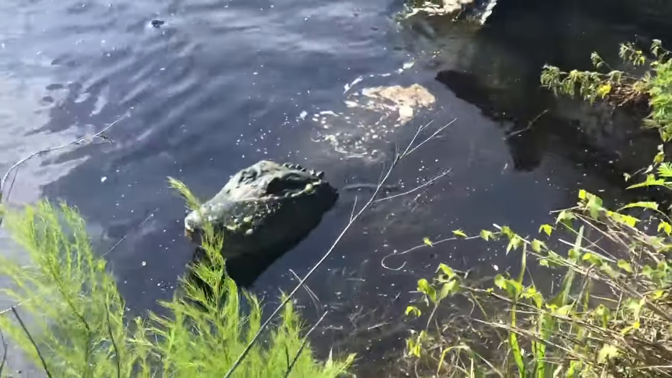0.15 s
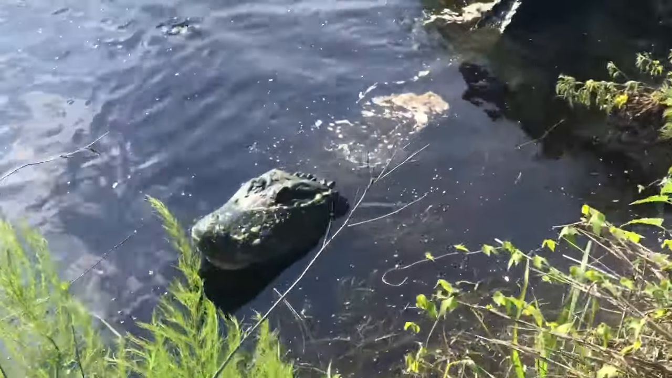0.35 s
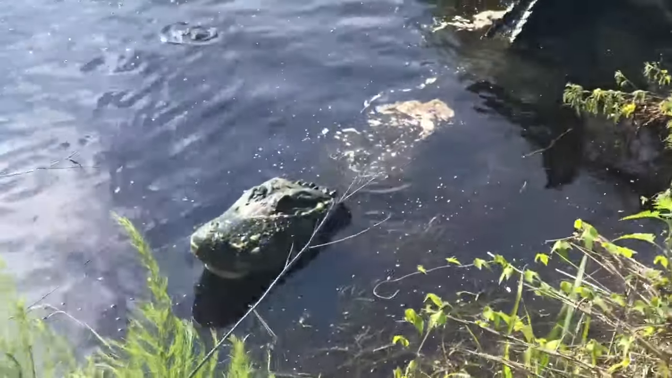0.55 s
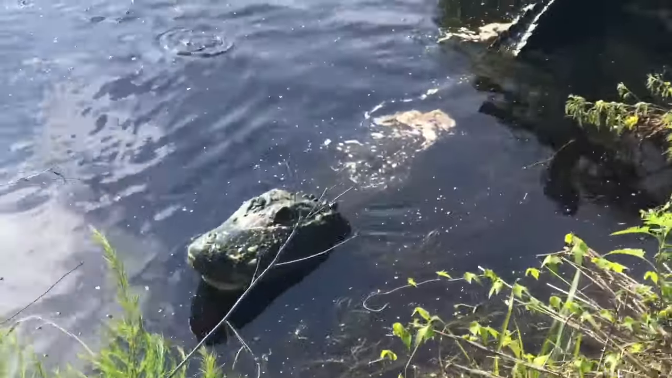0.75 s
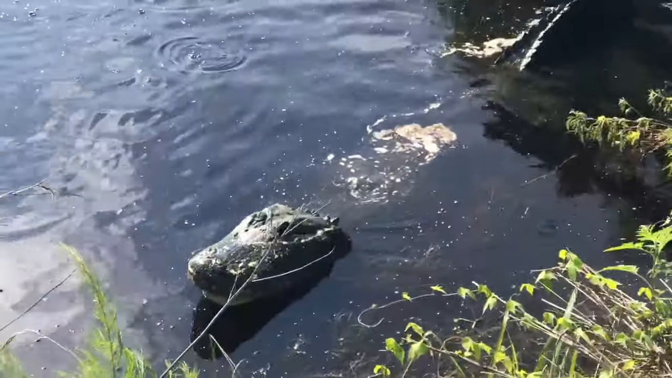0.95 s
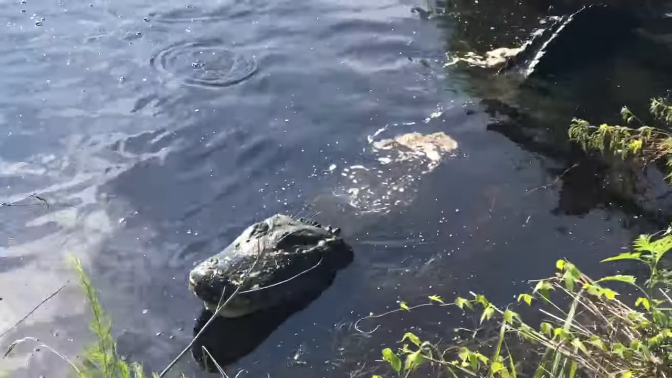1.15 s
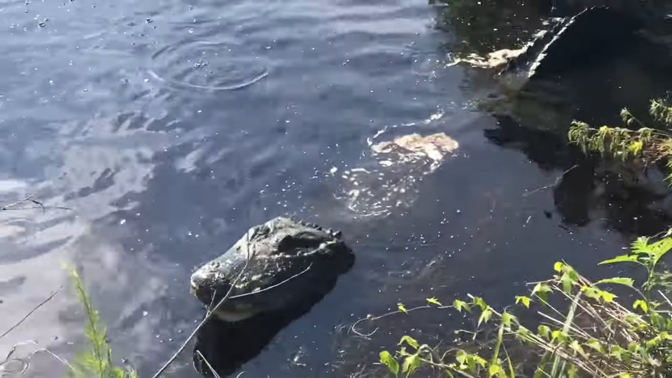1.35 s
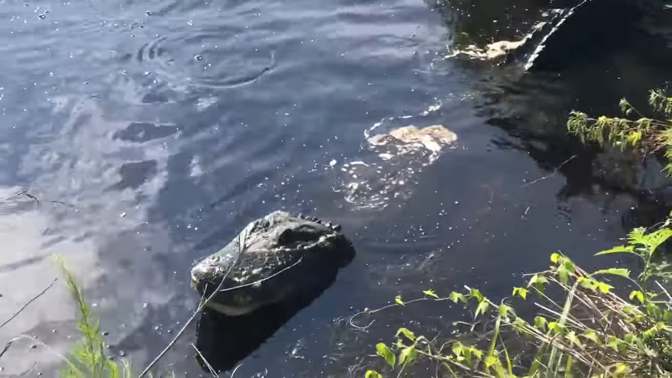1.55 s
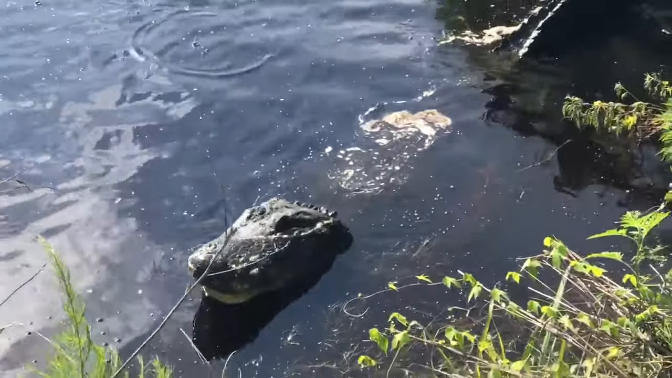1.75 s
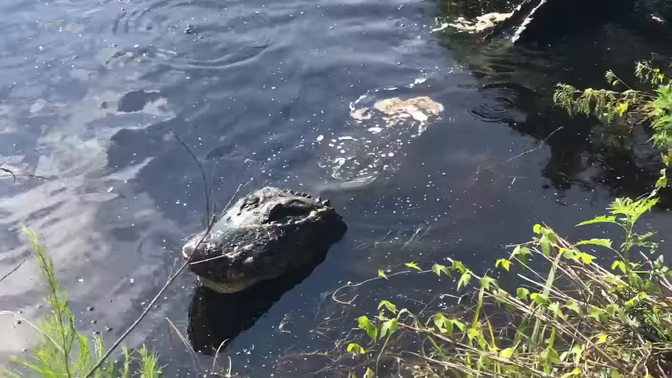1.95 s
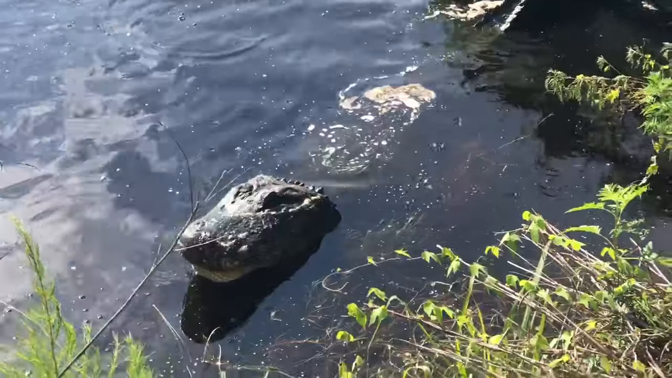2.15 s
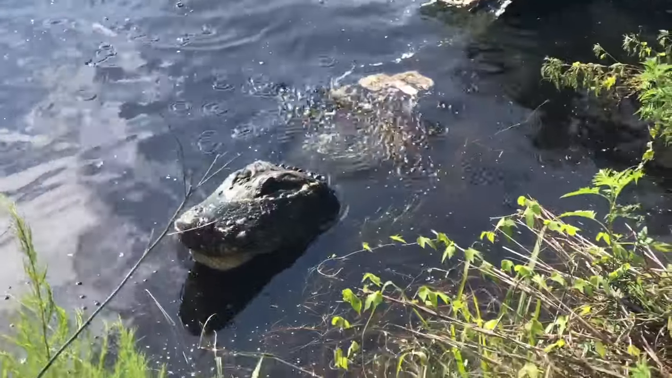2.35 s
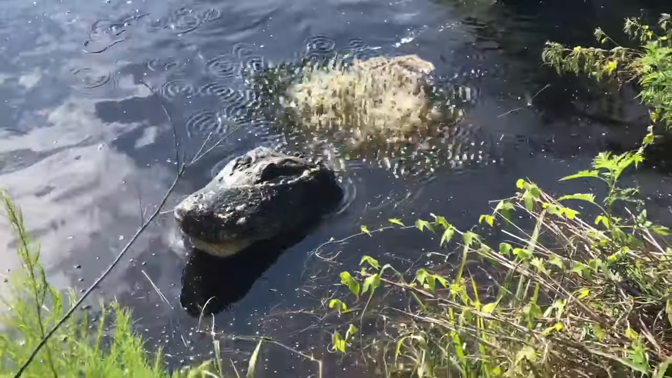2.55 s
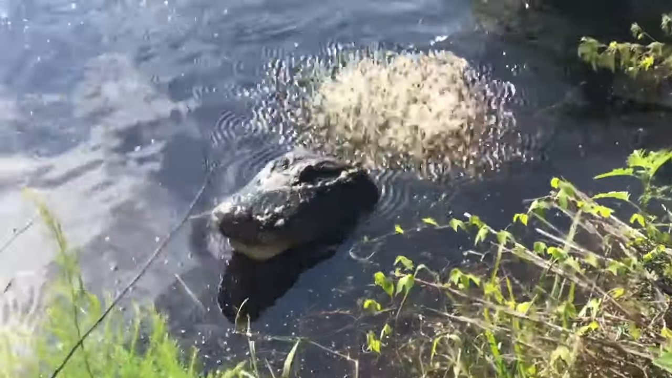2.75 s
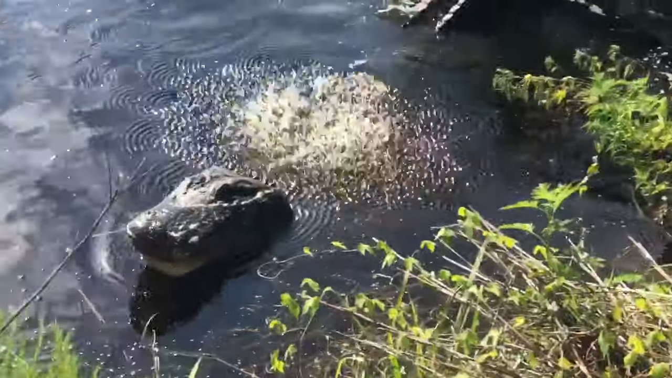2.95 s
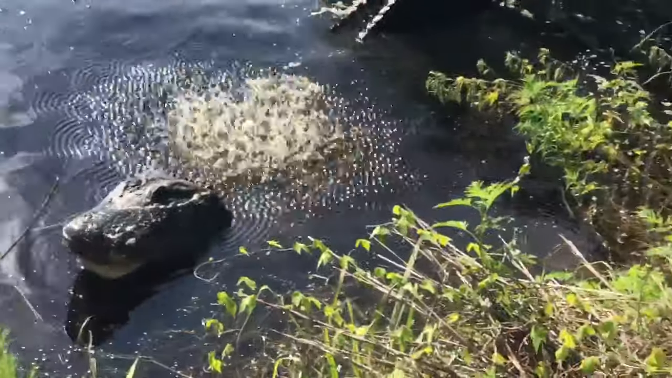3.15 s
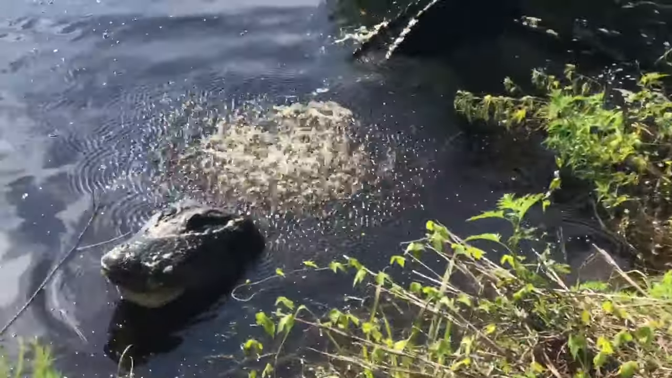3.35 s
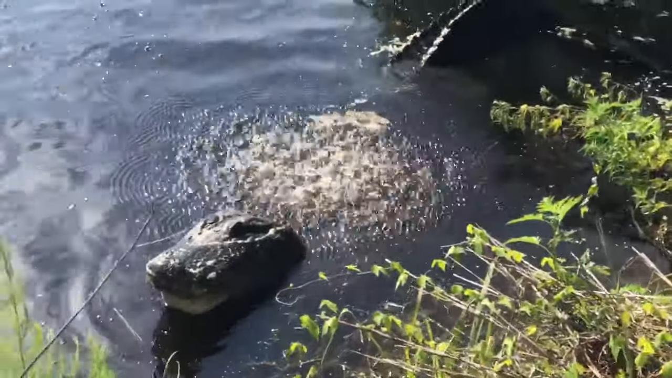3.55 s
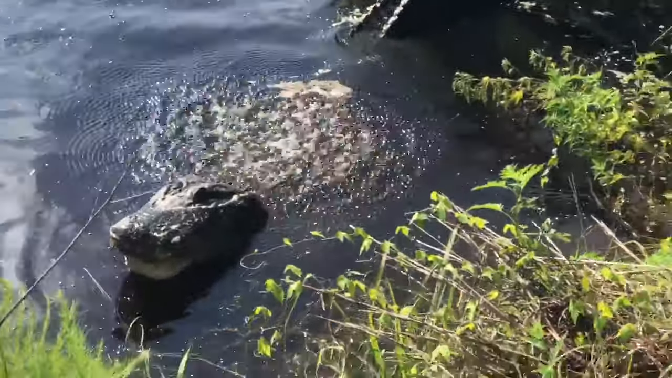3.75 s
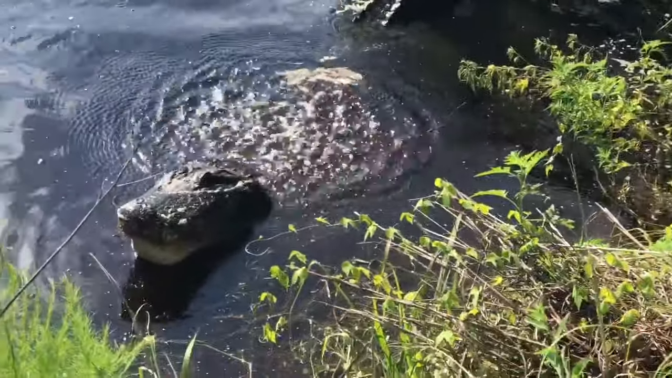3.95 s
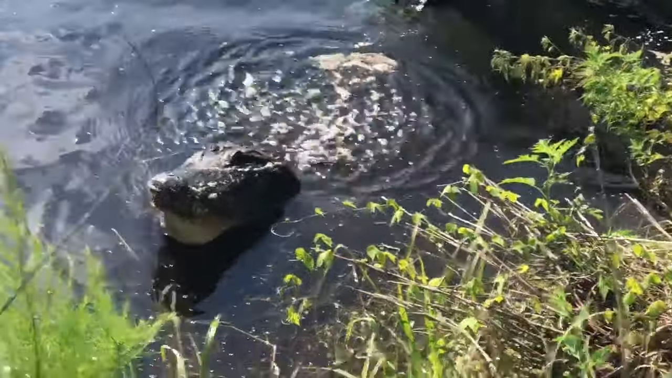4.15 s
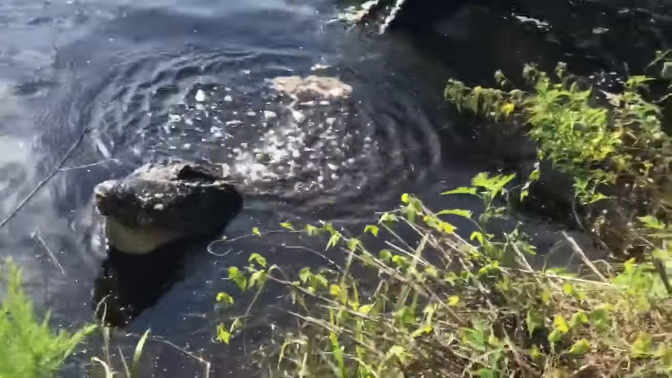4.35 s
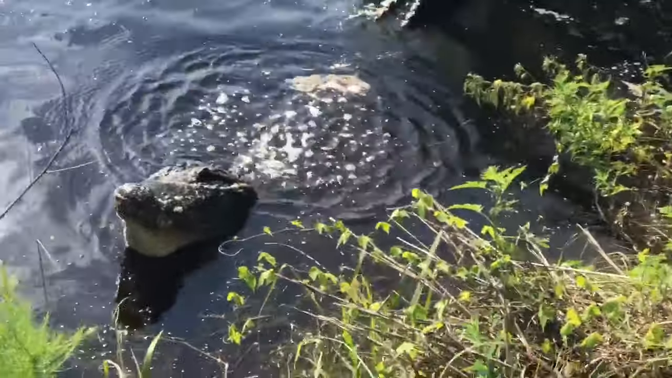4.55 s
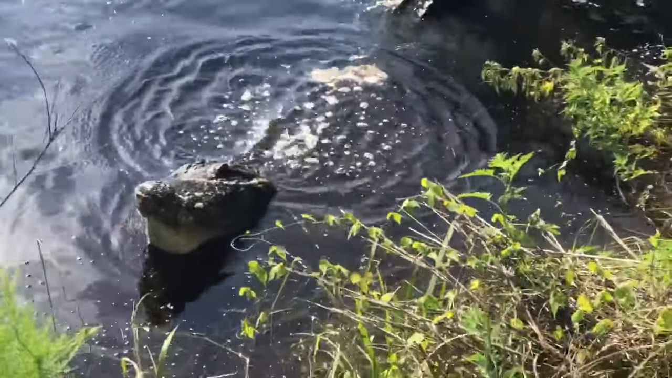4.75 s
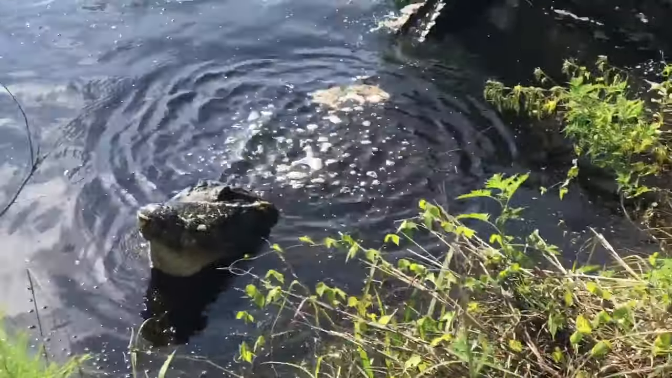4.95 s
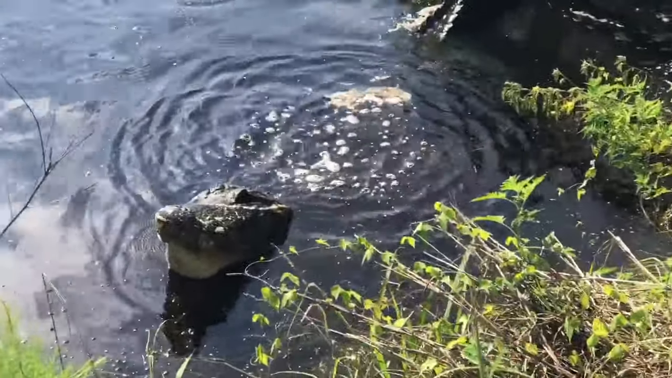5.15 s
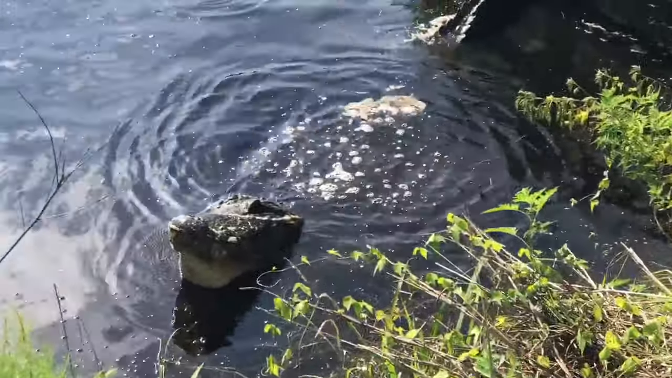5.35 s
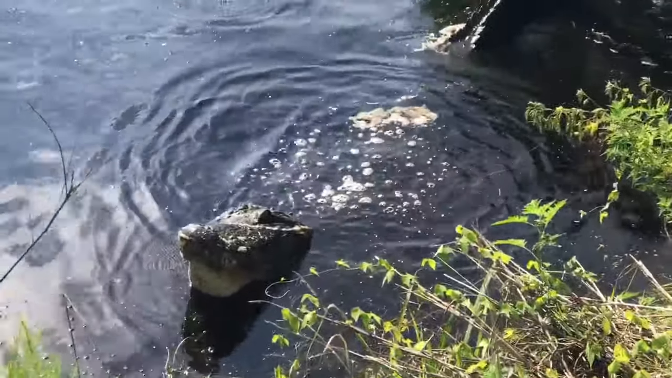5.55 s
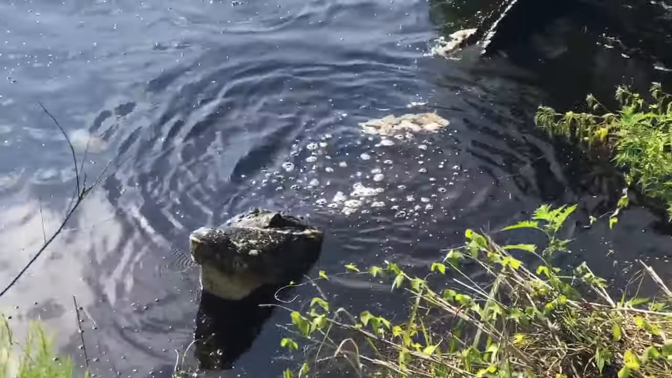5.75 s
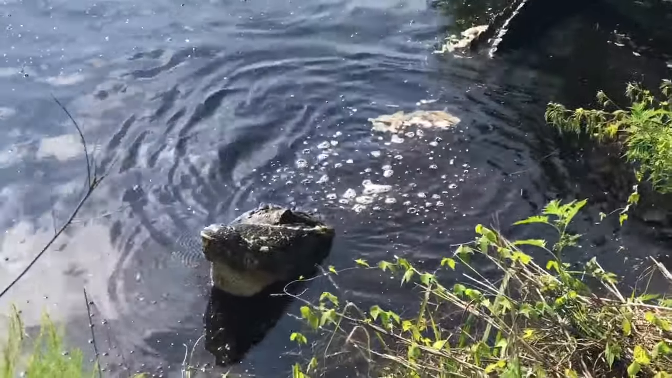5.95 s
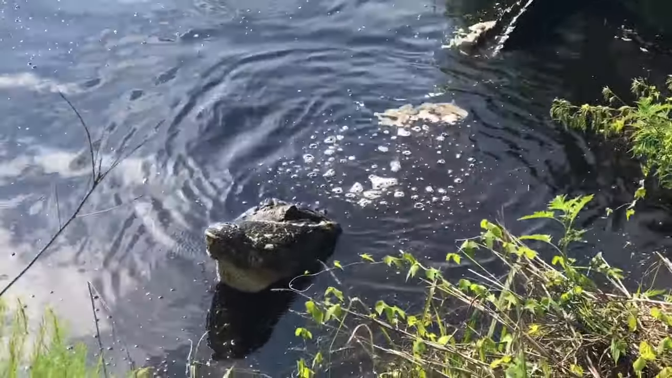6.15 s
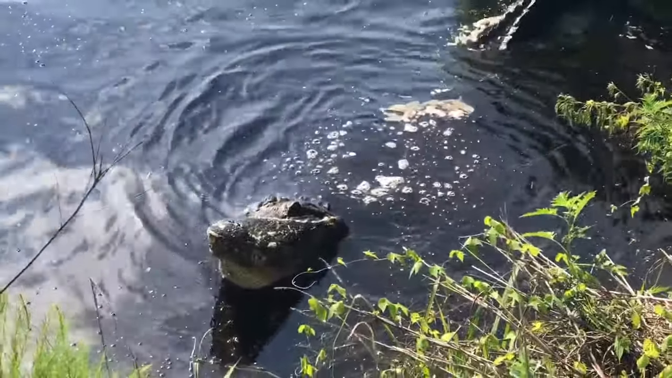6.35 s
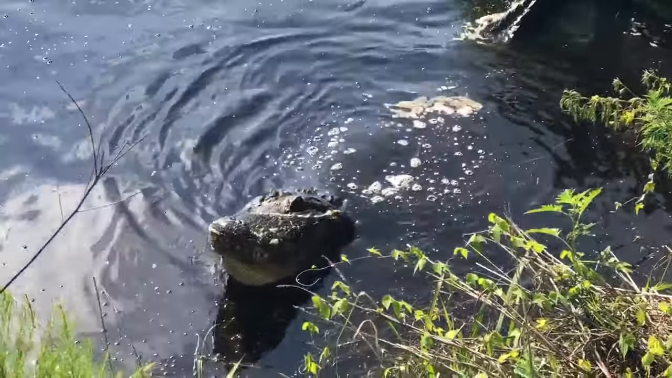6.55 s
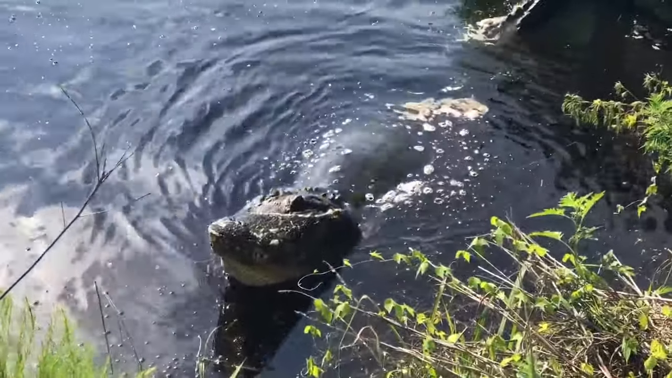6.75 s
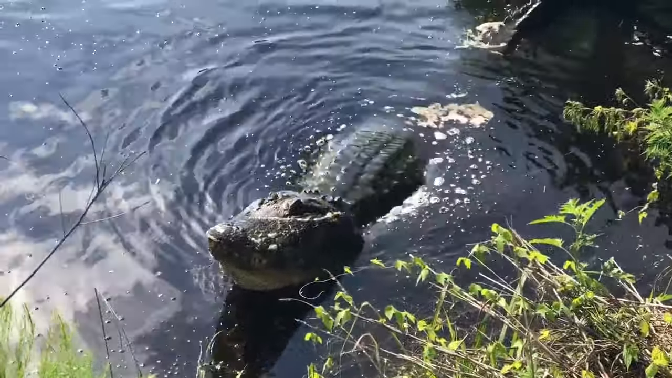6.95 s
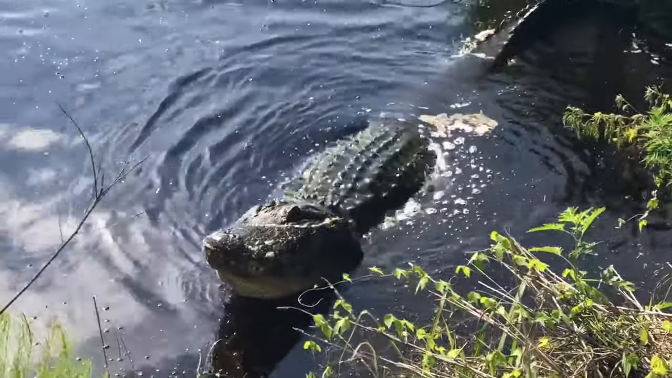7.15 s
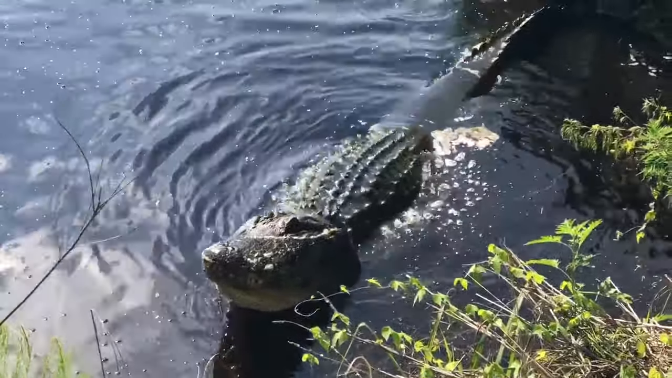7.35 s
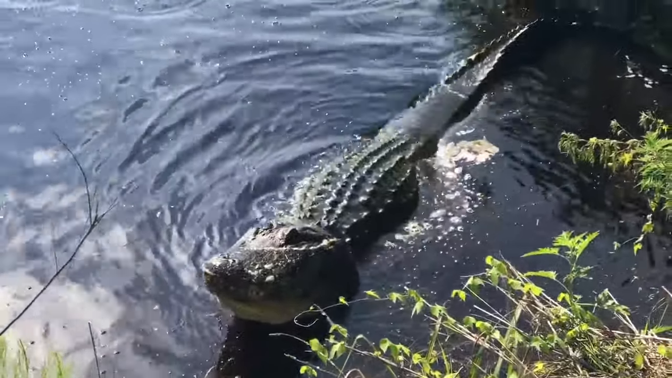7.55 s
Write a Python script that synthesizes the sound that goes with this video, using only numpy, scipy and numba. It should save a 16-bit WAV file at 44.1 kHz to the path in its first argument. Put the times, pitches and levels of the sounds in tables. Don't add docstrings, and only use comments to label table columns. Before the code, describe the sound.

Outdoors at a still pond, a close handheld microphone picks up soft lapping, small drips, grass ticks, faint insects and wind bumps. Then the alligator's flanks thump fast and low, throwing water in a pulsing, sizzling spray. A few loose throat flaps catch into a loud, deep, rattling bellow with breathy hiss, slowing into separate pulses and dying away. Lapping and brighter drips return.

```python
import sys
import numpy as np
from scipy import signal
from scipy.fft import rfft, irfft
from scipy.io import wavfile
from scipy.ndimage import uniform_filter1d
from numba import njit

SR = 44100
rng = np.random.default_rng(int(sys.argv[2]) if len(sys.argv) > 2 else 0)


def unload_wav(signal):
    wavfile.write(
        sys.argv[1],
        SR,
        np.round(np.clip(np.atleast_2d(signal).T, -1, 1) * 32767).astype(np.int16),
    )


def ratio(d):
    e = np.asarray(d, float) / 20
    return 10 ** e


N = 335160

# (time [s], effort [dB])
BELLOW = [
    (4.016, -16),
    (4.3, -15.5),
    (4.9, -18.5),
    (5.2, -19.5),
    (5.42, -25),
    (5.8, -28),
    (5.98, -32),
    (6.1, -35),
    (6.2, -46),
]
# (time [s], rate [Hz])
FOLD_RATE = [(4.016, 53.79), (4.25, 51.96), (4.65, 47.81), (5.04, 42.67), (5.3, 36.0), (5.45, 30.21),
             (5.75, 26.47), (5.92, 25.35), (6.2, 15.69)]
# (rate [Hz]), (share [1])
WEAK = ((53, 52, 50.5, 49.5, 47.5, 46.3, 39.5, 36.5, 26, 16),
         (.04, .15, .15, .04, .06, .32, .25, .03, .06, .5))
# (rate [Hz]), (lead [cycles])
EARLY = ((53, 52, 50.5, 49.5, 47.5, 46.3, 39.5, 36.5), (.02, .05, .058, .012, .012, .055, .06, 0))
# (rate [Hz]), (share [1])
REBOUND = ((52, 50.5, 49, 43, 31, 28), (.45, .36, 0, .05, .28, .35))
# (rate [Hz]), (delay [ms])
REBOUND_MS = ((53.5, 40), (9.4, 12))
# (rate [Hz]), (centre [Hz])
NECK = ((52, 50.5, 48.5, 44, 41, 38, 33, 30, 26), (200, 190, 170, 166, 158, 146, 135, 160, 175))
# (rate [Hz]), (level [dB])
PHARYNX = ((52, 46, 40, 33, 30, 24), (-2, -4.5, -4, -2, 0, -3))
# (rate [Hz]), (share [1])
PULSED = ((53.7, 53.2, 45, 29, 26, 20), (.58, .2, .35, .46, .55, .65))
# (rate [Hz]), (level [dB])
HISS_DIES = ((20, 16), (0, -16))
# (rate [Hz]), (level [dB])
UPPER = (52, 47, 42, 36, 29, 16), (-14, -12, -16, -6, -2, -5)
CHEST = (53.5, 52.8, 43, 36, 29, 16), (-10, -13, -14, -19, -18, -20)
FLIP_HZ, FORESLAP, FORESLAP_MS = 27.75, ((27.7, 25, 16), (.45, .17, .1)), -11
THROB_HZ, THROB_SPAN_HZ, THROB, THROB_REST = 49, 2.2, .3, .06
# (centre [Hz], width [Hz], level [dB])
THROAT = [(48.8, 7.5, 0), (97, 39.4, 4.5), (273, 270, 0)]

# (time [s], airflow [dB], mouth resonance [Hz], mouth opening [dB])
BREATH = [
    (3.9, -63, 960, -15),
    (4.0, -52, 950, -19),
    (4.06, -39.5, 910, -1.5),
    (4.3, -38.5, 924, -9),
    (4.6, -43, 986, -9),
    (4.95, -43, 1033, -7),
    (5.5, -48, 1140, 2),
    (5.9, -57, 1202, -1.5),
    (6.22, -66.5, 1330, 3),
]
# (centre [Hz], width [Hz], level [dB])
AIRWAY = [(635, 40, -8), (1325, 45, 1), (1385, 45, 3), (1990, 45, -6), (2212, 54, -4), (2396, 32, 1),
          (2560, 43, -8), (2837, 35, -4), (3056, 35, -5), (3582, 65, -4), (4070, 40, -7), (4250, 55, -6),
          (5420, 50, -9)]
# (centre [Hz], width [Hz], level [dB])
RASP = [(1330, 30, 1), (1710, 40, 3), (2320, 26, -38), (3610, 49, -30), (4000, 90, 1), (4160, 70, -8),
        (4570, 33, 16), (5200, 64, -18)]
# (frequency [Hz], density [dB])
HISS = [(260, -42), (450, -15), (791, -19.5), (890, -18), (1150, -14), (1330, -11), (1870, -33),
        (2410, -17), (2590, -17.5), (4160, -14), (4830, -17), (9280, -19), (15600, -28.5)]
HISS_DB, HISS_DIP_DB = 1.5, -2.5
# (time [s]), (centre [Hz])
PALATE = (3.95, 4.5, 5.5), (862, 885, 908)
TONGUE = (4.03, 4.27, 4.46, 5.1, 5.9), (1810, 1570, 1680, 1670, 1850)
# (time [s]), (level [dB])
PALATE_DB, TONGUE_DB = ((4.3, 4.7, 5.0, 5.6), (-1, -5, -8, -8)), -8
# (time [s], peak [dB], ring [Hz])
SNAPS = [(5.1173, -29.5, 3630), (5.2495, -38, 2400), (5.3403, -26, 4280), (5.3991, -30, 4170),
         (5.4635, -34, 2360), (5.5973, -33, 3880), (5.6341, -30, 3600), (5.6674, -47, 2390),
         (5.7039, -49, 2280), (5.74, -33, 4450), (5.7778, -52, 2470), (5.813, -53, 2320)]

# (time [s], level [dB])
FLAPS = [
    (3.712, -33),
    (3.76, -30.5),
    (3.805, -23),
    (3.84, -29.5),
    (3.92, -32),
    (3.96, -27),
]
# (time [s], rate [Hz])
FLAP_RATE = [(3.72, 35), (3.79, 34.3), (3.82, 31), (3.87, 32.8), (3.92, 30), (3.97, 21)]

# (time [s], flank effort [dB], water thrown [dB])
SHUDDER = [
    (2.29, -58, -77),
    (2.42, -53, -65),
    (2.58, -43.5, -48),
    (2.69, -43, -40),
    (2.8, -37.5, -42.5),
    (3.1, -39, -47),
    (3.3, -45.5, -51),
    (3.65, -38.5, -55),
    (3.8, -45, -52.5),
    (3.9, -34, -53),
]
# (time [s], rate [Hz])
FLANK_RATE = [(2.4, 16.65), (2.6, 17.64), (2.8, 19.59), (3.0, 19.94), (3.2, 22.42), (3.4, 22.63),
              (3.6, 23.85), (3.8, 22.5)]
# (time [s]), (centre [Hz])
FLANK_HZ = ((2.5, 2.9, 3.2, 3.45), (56, 50, 52, 44))
SNAP_LOOSE_DB, SNAP_TIGHT_DB, SNAP_TIGHTENS_S = -46, -58.5, (2.84, 2.97)
SPRAY_TILT_DB = (-9.5, 0.5, 0.5)
SPRAY_FINER_S = (2.5, 2.72, 3.7)
SPRAY_FILLS_S, SPRAY_EVEN = (2.8, 3.9), (0.04, 0.4)
BIG_DROPS_LEAD = .035
BIG_DROPS_LINGER = .12
MIST_GRAIN_DB = 3.5
# levels [dB], times [s]
WHISTLE_DB, WHISTLE_OPENS_S = (-67, -52.5, -57, -58), (3.05, 3.2, 3.88, 3.96)
# (centre [Hz], width [Hz], level [dB])
NOSTRIL = [(2020, 20, -2), (2560, 14, 4), (2830, 17, 2), (3150, 20, 0), (3350, 30, -8), (3750, 55, -7),
           (4150, 62, -4), (4380, 59, -7), (4740, 65, -7), (5210, 59, -11)]
# (time [s], peak [dB])
KNOCKS = [(3.0992, -32.5), (3.1388, -40), (3.1867, -39), (3.223, -37), (3.271, -34), (3.4064, -52),
          (3.4554, -38), (3.5354, -58), (3.6237, -49), (3.6691, -32.5), (3.714, -34), (3.7467, -28),
          (3.7733, -30), (3.8028, -26.5), (3.8394, -45), (3.8715, -35.5), (3.981, -39)]

# (frequency [Hz], density [dB])
POND = [(150, -42), (250, 2.5), (420, -1), (636, 3.5), (783, -5), (1290, 1.5), (2720, -9.5), (3650, -8.5),
        (5070, -12), (8510, -17.5), (10500, -17), (13100, -41), (15600, -17)]
# (time [s], level [dB], half length [s])
LAPS = [(.23, -64, 0.046), (1.0, -62.5, 0.13), (1.95, -62, 0.097), (2.35, -61, 0.32), (6.2, -61.5, 0.13),
        (6.43, -60.5, 0.048), (6.67, -56, 0.09), (6.95, -57, 0.044), (7.15, -52.5, 0.072),
        (7.28, -53.5, 0.14), (7.51, -67, 0.15)]
STILL_DB, WAKE_DB, WAKE_S = -58, -55.5, (2.3, 6.2)
LAP_WANDER_DB, LAP_LOUDEST_DB, LAP_SPREAD_DB = 2.2, 13, 4.6
# (time [s], peak [dB], pitch [Hz], ring [cycles])
DRIPS = [(0.56, -45, 1600, 4.5), (0.696, -54, 3560, 5.2), (0.74, -63, 980, 6), (0.793, -51, 1060, 5.7),
         (0.974, -61, 1040, 8.3), (1.273, -54, 1990, 8), (1.4, -48, 1270, 4.6), (1.63, -62, 630, 6),
         (1.705, -54, 1220, 5.4), (1.926, -64, 600, 5.5), (1.994, -58, 594, 6), (2.037, -57, 684, 6),
         (2.111, -66, 694, 6), (2.203, -50, 795, 6), (2.433, -36, 995, 2.5), (2.471, -33.5, 1550, 5.4),
         (3.24, -44, 568, 6.3), (3.371, -36, 740, 4.2), (5.311, -34.5, 3610, 36), (6.301, -44.5, 264, 3.8),
         (6.139, -46, 1880, 8), (6.414, -45, 1400, 5.3), (6.638, -40, 1950, 8.6), (6.733, -62, 740, 5.5),
         (6.83, -50, 1260, 4.9), (7.087, -42, 1110, 4.9), (7.107, -43, 2980, 5.5), (7.135, -41, 860, 4.6),
         (7.298, -55, 696, 7.8), (7.506, -40, 2220, 3.9)]
# (time [s], peak [dB], bubble [Hz])
PLINKS = [(0.2199, -44, 2680), (0.2414, -44, 2080), (0.52, -43, 6340), (0.5595, -42.5, 2480),
          (0.6649, -49, 2470), (0.6963, -51, 3420), (0.7941, -46, 2010), (0.865, -51, 1820),
          (0.9737, -51, 2080), (1.0393, -56, 5900), (1.0959, -45, 2010), (1.2246, -49, 2850),
          (1.2735, -53, 2010), (1.3977, -57, 1920), (1.5698, -48, 6020), (1.6427, -53, 3710),
          (1.7055, -50, 2180), (1.7365, -44, 6260), (1.8507, -50, 2240), (1.9919, -41.5, 2600),
          (2.037, -45, 2500), (2.1096, -42, 3700), (2.1505, -47, 2070), (2.2014, -45, 1670),
          (2.237, -50, 3730), (2.3146, -55, 1900),
          (6.2881, -54, 2200), (6.3265, -49, 1600), (6.3964, -49, 2450), (6.4233, -44, 1490),
               (6.6378, -40, 2010), (6.8314, -46, 2040), (6.8816, -47, 1870), (6.9357, -40, 1640),
               (6.9646, -45, 1530), (6.987, -40, 1530), (7.0334, -47, 2040), (7.0843, -46, 1520),
               (7.1073, -46, 3040), (7.1821, -39, 1800), (7.221, -42, 3080), (7.292, -49, 2020),
               (7.373, -41, 2330), (7.5049, -38, 2310)]

# (frequency [Hz], density [dB])
GRASS = [(1470, -14), (2500, -0.5), (3220, 4), (4470, -0.5), (4830, -5), (6920, -1), (10400, -2),
         (13000, 2.5), (15600, -5)]
# (time [s], level [dB], half length [s])
RUSTLES = [(.22, -57.5, 0.036), (.54, -70, 0.028), (1.02, -72, 0.03), (1.45, -91, 0.069), (2.2, -89, 0.092),
           (6.456, -59.5, 0.052), (6.57, -59, 0.031), (6.66, -59, 0.043), (6.87, -72, 0.083),
           (7.13, -55, 0.022), (7.5, -82, 0.062)]
GRASS_REST_DB = -64.5
# (time [s], peak [dB], centre [Hz])
TICKS = [(0.22, -39, 9260), (0.521, -38, 5700), (0.665, -49, 3630), (0.7826, -57, 4300),
         (1.0395, -36, 6400), (1.0844, -49, 8700), (1.7559, -43, 6400), (6.4637, -52, 6970),
         (6.9371, -39.5, 6880), (7.0858, -51.5, 4120), (7.1144, -41, 4690), (7.22, -38, 3500),
         (7.2944, -44, 4670), (7.3053, -38, 5500)]
# (pitch [Hz], level [dB], first phrase centre [s], repeat [s], phrase length [s])
SONGS = [
    (8400, -76, .35, .553, .32),
    (9150, -73, .17, .186, .055),
    (5400, -74, 2.42, 9, .45),
]
# (frequency [Hz], density [dB])
WIND = [(13, -39), (22, 2), (42, 0.5), (64, 8), (103, -0.5), (136, 4.5), (308, -28.5), (341, -29),
        (450, -23), (580, -77), (990, -120)]
# (time [s], level [dB], half length [s])
GUSTS = [(.24, -52.5, 0.056), (.49, -53, 0.047), (.68, -59, 0.085), (.9, -46.5, 0.052),
         (1.03, -50.5, 0.014), (1.27, -58, 0.039), (1.64, -60, 0.024), (1.86, -69, 0.025), (2.4, -59, 0.12),
         (3.2, -50, 1), (6.31, -60, 0.05), (6.67, -60, 0.21), (6.9, -59, 0.042), (7.14, -66, 0.14),
         (7.4, -60, 0.064), (7.6, -52, 0.042)]
CALM_DB = -57.5
FAR_DB, FAR_PER_GUST_DB, FAR_LATE_DB, FAR_NEARS_S = -76.5, 2.11, -51.5, (6.8, 6.95)


def ramp(times, values):
    return np.interp(np.arange(N) / SR, times, values)


def curves(table):
    s, *columns = np.transpose(table)
    mask = ramp([s[0] - .012, s[0], s[-1], s[-1] + 0.27], [0, 1, 1, 0])
    return [ramp(s, column) for column in columns] + [mask]


def law(rate, rule):
    return np.interp(-rate, -np.array(rule[0], float), rule[1])


def swells(events, rest_db):
    t = np.arange(N) / SR
    bells = sum(ratio(db) * np.exp(-((t - s) / half) ** 2) for s, db, half in events)
    return 20 * np.log10(ratio(rest_db) + bells)


def unit(x, weight=1.):
    return x / np.sqrt(np.sum(weight * x ** 2) / np.sum(weight + 0 * x))


def steady(x):
    return x / np.sqrt(uniform_filter1d(x ** 2, 7000) + 1e-12)


def coloured(spectrum):
    hz, db = np.transpose(spectrum)
    f = np.maximum(np.fft.rfftfreq(N, 1 / SR), 1)
    gain = ratio(np.interp(np.log(f), np.log(hz), db, -90, -90))
    return unit(irfft(rfft(rng.standard_normal(N)) * gain, N))


def walk(rate):
    k = int(SR / rate)
    held = np.repeat(rng.standard_normal(N // 200 + 1), k)[:N]
    return unit(uniform_filter1d(uniform_filter1d(held, k), k))


@njit
def svf(x, hz, width):
    y, b, l = np.empty(len(x)), 0., 0.
    for i in range(len(x)):
        g, k = np.tan(np.pi * hz[i] / SR), width / hz[i]
        v = (b + g * (x[i] - l)) / (1 + g * (g + k))
        b, l, y[i] = 2 * v - b, l + 2 * g * v, k * v
    return y


def ring(x, modes, patchy_db=0., drift=0.):
    out = np.zeros(N)
    for k, (hz, width, db) in enumerate(modes):
        level_db = db + (patchy_db * walk(9.7) if patchy_db else np.zeros(N))
        centre_hz = hz * (1 + (drift * walk(6) if drift else np.zeros(N)))
        out += (-1) ** k * ratio(level_db) * svf(x, centre_hz, 1. * width)
    return out


@njit
def bubbles(start, hz, cycles, size, rise):
    y = np.zeros(N)
    for k in range(len(start)):
        fade, p, a, i = hz[k] / cycles[k] / SR, 0., size[k], int(start[k] * SR)
        for j in range(min(int(6 / fade), N - i)):
            p += 2 * np.pi * hz[k] / SR * (1 + rise * j * fade)
            y[i + j] += a * np.sin(p)
            a *= 1 - fade
    return y


def beats(rate, first_s, jitter, scatter_db):
    turns = np.cumsum(curves(rate)[0]) / SR
    turns = turns - turns[int(first_s * SR)] + jitter * walk(25) + 600
    return turns, ratio(scatter_db * rng.standard_normal(1200))[turns.astype(int)]


def wraps(turns):
    return np.maximum(np.diff(np.floor(turns), prepend=np.floor(turns[0])), 0)


def bellow():
    rate = curves(FOLD_RATE)[0]
    turns, size = beats(FOLD_RATE, 4.039, jitter=.016, scatter_db=.8)
    throb = THROB_REST + THROB * np.exp(-((rate - THROB_HZ) / THROB_SPAN_HZ) ** 2)
    size = size * (1 + throb * np.cos(np.pi * (turns - 614) / 3))
    s, peak_db, hz = np.transpose(SNAPS)
    snaps = bubbles(s, hz, 22 + 0 * s, ratio(peak_db - 8), 0.)
    return fold_voice(rate, turns, size) + breath(rate, turns, size) + snaps


def fold_voice(rate, turns, size):
    db, on = curves(BELLOW)
    strong_beats = wraps(turns / 2)
    weak_beats = (1 - law(rate, WEAK)) * wraps((turns + 1 + law(rate, EARLY)) / 2)
    clicks = size * (strong_beats + weak_beats) * (on == 1)
    tight = rate > FLIP_HZ
    second = np.where(tight, law(rate, REBOUND), law(rate, FORESLAP))
    lag_ms = np.where(tight, law(rate, REBOUND_MS), FORESLAP_MS)
    at = np.flatnonzero(clicks)
    clicks[at + (lag_ms[at] * SR / 1000).astype(int)] += second[at] * clicks[at]
    levels_db = law(rate, UPPER), law(rate, CHEST), law(rate, PHARYNX)
    return -on * ratio(db) * steady(throat(clicks + 1e-9, law(rate, NECK), *levels_db))


def throat(clicks, centre_hz, upper_db, chest_db, low_db=0):
    chest, low, upper = (ring(ring(clicks, [mode]), [mode]) for mode in THROAT)
    neck = svf(svf(clicks, centre_hz, 73.0), centre_hz, 73.0)
    middle = steady(ratio(low_db) * low - ratio(6.0) * neck)
    voice = middle - ratio(chest_db) * steady(chest) + ratio(upper_db) * steady(upper)
    return signal.sosfilt(signal.cheby2(7, 40, 465, fs=SR, output="sos"), voice)


def breath(rate, turns, size):
    on = curves(BELLOW)[-1]
    airway_db, mouth_hz, open_db, blowing = curves(BREATH)
    pulsed = law(rate, PULSED)
    late = (turns - .19) % 1
    burst = 5 * size * (1 - np.exp(-late / .015)) * np.exp(-late / .13)
    puff = (1 - pulsed + pulsed * burst) * ratio(0.77 * walk(11))
    slap = ratio(20) * pulsed ** 2 * size * wraps(turns - .21)
    air = puff * rng.standard_normal(N) + slap

    mouth = unit(svf(svf(air, mouth_hz, 37.0), mouth_hz, 150.0), on)
    palate_hz, tongue_hz = ramp(*PALATE), ramp(*TONGUE)
    palate = ratio(ramp(*PALATE_DB)) * unit(svf(svf(air, palate_hz, 20.0), palate_hz, 82.0), on)
    tongue = ratio(TONGUE_DB + 3.9 * walk(9)) * unit(svf(air, tongue_hz, 59.0), on)
    airway = unit(ring(air, AIRWAY, patchy_db=3.0, drift=0.0056), on)

    hiss_db = airway_db + HISS_DB + HISS_DIP_DB * 2 * law(rate, WEAK) + law(rate, HISS_DIES)
    hiss = ratio(hiss_db) * puff * coloured(HISS)
    rasp = steady(ring(burst * rng.standard_normal(N), RASP, patchy_db=4.5, drift=.01))
    rasp = ratio(airway_db - 4.5) * pulsed ** 2 * rasp
    ringing = ratio(airway_db) * (airway + palate + tongue) + ratio(airway_db + open_db) * mouth
    return blowing * (ringing + hiss + rasp)


def flaps():
    db, on = curves(FLAPS)
    turns, size = beats(FLAP_RATE, 3.714, jitter=0.002, scatter_db=2)
    neck_hz = ramp((3.82, 3.87, 3.98), (165, 200, 120))
    return -on * ratio(db) * steady(throat(size * wraps(turns), neck_hz, -21, -33, -4))


def shudder():
    thump_db, spray_db, on = curves(SHUDDER)
    turns, size = beats(FLANK_RATE, 2.383, jitter=0.005, scatter_db=1.2)
    body_hz = ramp(*FLANK_HZ)
    thump = svf(svf(np.sqrt(size) * wraps(turns), body_hz, 28.), body_hz, 28.)
    snap_db = ramp(SNAP_TIGHTENS_S, (SNAP_LOOSE_DB, SNAP_TIGHT_DB))
    snap = ring(ring(size * wraps(turns), [(142, 32, 2), (290, 64, -4.5)]), [(196, 260, 0)])
    gates = spray_gates(turns)
    whistle = unit(ring(gates[2] * rng.standard_normal(N), NOSTRIL, patchy_db=2.2), on)
    whistle_db = ramp(WHISTLE_OPENS_S, WHISTLE_DB)
    body = -ratio(thump_db) * unit(thump, on) - ratio(snap_db) * unit(snap, on)
    return on * (body + ratio(spray_db) * spray(gates, on) + ratio(whistle_db) * whistle)


def spray_gates(turns):
    even = ramp(SPRAY_FILLS_S, SPRAY_EVEN)
    thrown = turns - .25 + .04 * walk(20)
    gates = []
    for k in range(5):
        late = (thrown + BIG_DROPS_LEAD * (4 - k)) % 1
        shower = (1 - np.exp(-late / .09)) * np.exp(-(late / (.68 * .79 ** k)) ** 2)
        gates.append(even + BIG_DROPS_LINGER * 2 ** -k + shower)
    return gates


def spray(gates, on):
    chance = rng.random((9000, 4)).T
    drop_size = ratio(np.minimum(-4.5 * np.log(chance[1]), 17))
    drop_hz = 650 * 2 ** (3.99 * chance[2])
    drops = bubbles(1.6 + 1.7 * chance[0], drop_hz, 2.1 + 2.9 * chance[3], drop_size, 0.039)
    tilt_db = ramp(SPRAY_FINER_S, SPRAY_TILT_DB)
    mist = np.zeros(N)
    for k, gate in enumerate(gates):
        band = unit(svf(rng.standard_normal(N), np.full(N, 850 * 1.75 ** k), 650 * 2.4 ** k))
        mist += gate * ratio(tilt_db * k + 3.6 * walk(29.61) + MIST_GRAIN_DB * walk(210)) * band
    both = steady(gates[0] * unit(drops, on) * ratio(-5.5) + steady(mist))
    return signal.sosfilt(signal.butter(4, 550, "highpass", fs=SR, output="sos"), both)


def knocks():
    t = np.arange(N) / SR
    decays = sum(ratio(db) * (t > s) * np.exp(-np.maximum(t - s, 0) / 0.0064) for s, db in KNOCKS)
    puffs = decays * rng.standard_normal(N)
    return ratio(14) * ring(puffs, NOSTRIL, patchy_db=2) + ratio(-11) * svf(puffs, np.full(N, 4200.), 3000.)


def pond():
    lap_db = swells(LAPS, ramp(WAKE_S, (STILL_DB, WAKE_DB)))
    chance = rng.random((3000, 4)).T
    bubble_size = ratio(np.minimum(-LAP_SPREAD_DB * np.log(chance[1]), LAP_LOUDEST_DB))
    bubble_hz = 650 * 2 ** (3.3 * chance[2] ** 1.5)
    laps = bubbles(7.55 * chance[0], bubble_hz, 3.1 + 9.2 * chance[3], bubble_size, 0.045)
    wash = coloured(POND) * ratio(LAP_WANDER_DB * walk(7.0))
    return ratio(-68) * coloured(POND) + ratio(lap_db - 6.5) * (wash + unit(laps))


def drips():
    s, peak_db, hz, cycles = np.transpose(DRIPS)
    single = bubbles(s, hz, cycles, ratio(peak_db), 0.023)
    s, peak_db, hz = np.transpose(PLINKS)
    return single + bubbles(s, hz, 8 + 0 * s, ratio(peak_db - 6), 0.012)


def grass():
    rustle = coloured(GRASS) * ratio(swells(RUSTLES, GRASS_REST_DB) - 3 + 1.6 * walk(40))
    s, peak_db, hz = np.transpose(TICKS)
    return rustle + bubbles(s, hz, 2.0 + 0 * s, ratio(peak_db), 0.)


def insects():
    t, out = np.arange(N) / SR, 0
    scrape = rng.standard_normal(N) * ratio(16.0)
    trill = (1 + np.sin(2 * np.pi * 62 * t)) ** 1.3
    for hz, db, first_s, every_s, length_s in SONGS:
        off = (t - first_s + every_s / 2) % every_s - every_s / 2
        phrase = np.exp(-(2 * off / length_s) ** 4) * (trill if length_s > .1 else 1)
        out = out + ring(phrase * scrape, [(hz, hz / 30, db)], patchy_db=1.5)
    return out


def wind_and_rumble():
    wind_db = swells(GUSTS, CALM_DB)
    wind = coloured(WIND) * ratio(wind_db + 2.36 * walk(20))
    far_db = FAR_DB + FAR_PER_GUST_DB * (wind_db - CALM_DB)
    far_db = np.maximum(far_db, ramp(FAR_NEARS_S, (FAR_DB, FAR_LATE_DB)))
    rumble = unit(ring(ring(rng.standard_normal(N), [(203.0, 52, 0)]), [(203, 49, 0)]))
    return wind + rumble * ratio(far_db - 5 + 5.1 * walk(35))


def scene():
    animal = bellow() + flaps() + shudder() + knocks()
    t = np.arange(SR // 4) / SR
    banks = rng.standard_normal(SR // 4) * np.exp(-t / 0.031)
    echo = signal.fftconvolve(animal, banks / np.sqrt(np.sum(banks ** 2)))[:N]
    echo = ratio(-15) * np.pad(echo, (600, 0))[:N]
    wetland = pond() + drips() + grass() + insects() + wind_and_rumble()
    return (animal + echo + wetland)[None]


def roll_off(x):
    return signal.sosfilt(signal.butter(12, 15740, fs=SR, output="sos"), x)


def record(dry):
    x = signal.sosfilt(signal.butter(2, 28, "highpass", fs=SR, output="sos"), dry[0])
    x = x - 0.42 * svf(x, np.full(N, 10500.), 1070.0)
    x = signal.sosfilt(signal.ellip(10, .3, 60, 15650, fs=SR, output="sos"), x)
    mix = np.tanh(1.083 * x[None]) / 1.132
    return roll_off(mix)


dry = scene()
out = record(dry)
unload_wav(out)
```